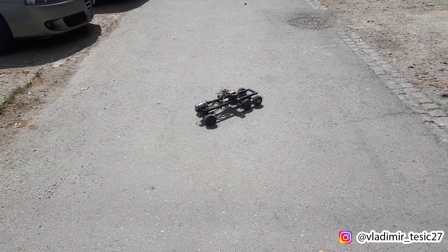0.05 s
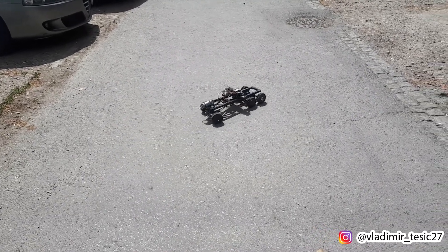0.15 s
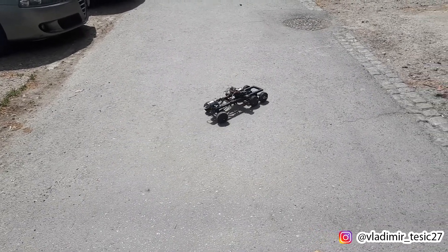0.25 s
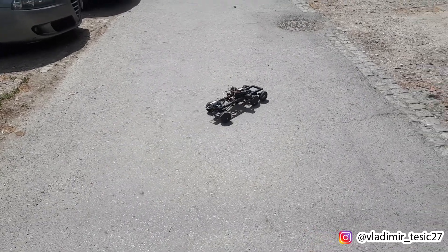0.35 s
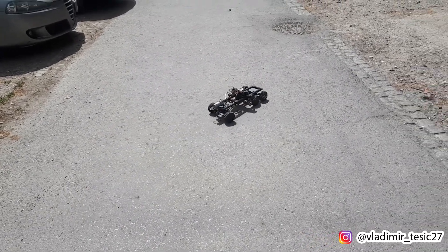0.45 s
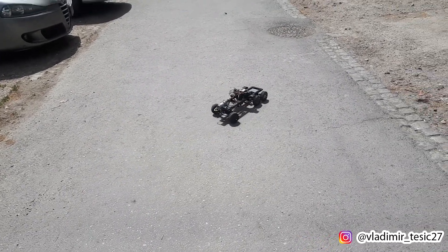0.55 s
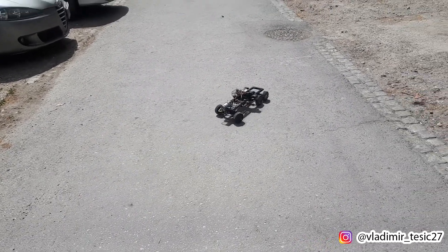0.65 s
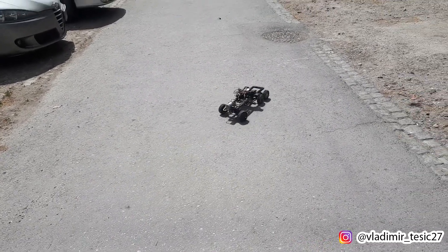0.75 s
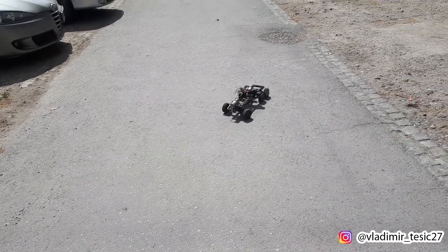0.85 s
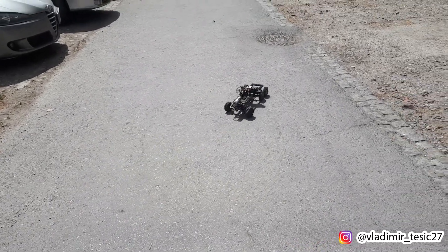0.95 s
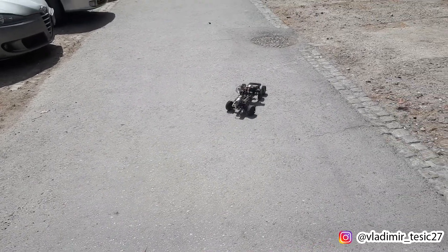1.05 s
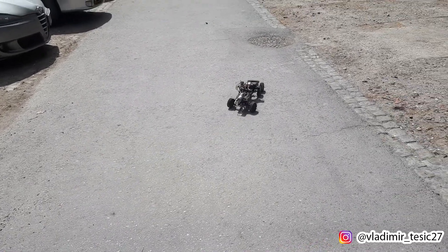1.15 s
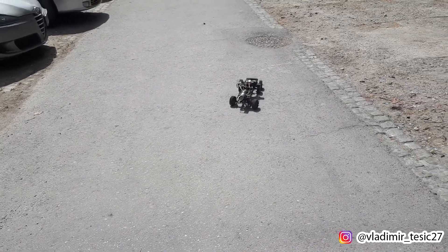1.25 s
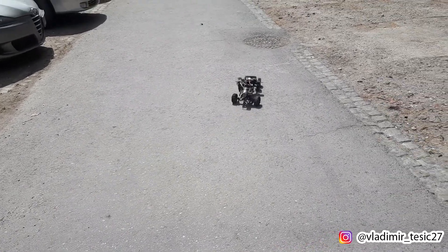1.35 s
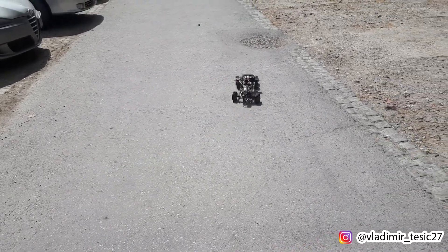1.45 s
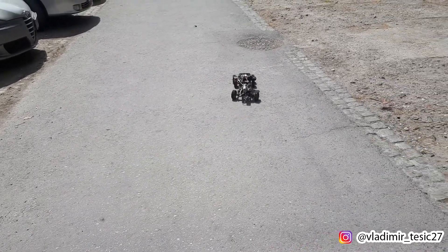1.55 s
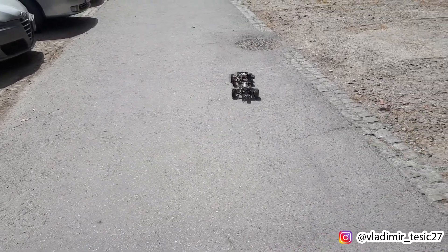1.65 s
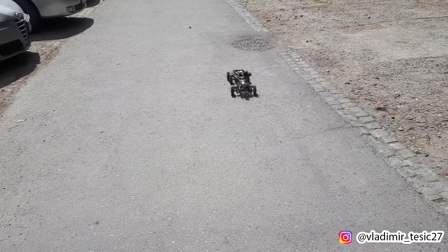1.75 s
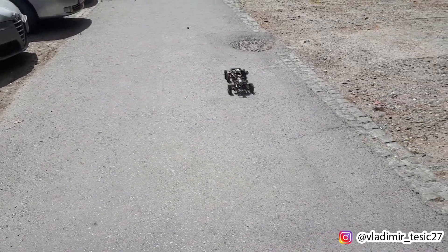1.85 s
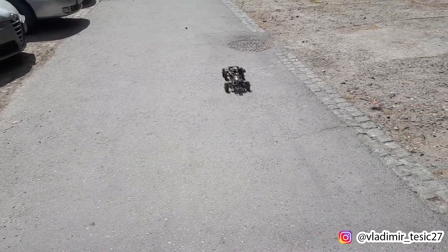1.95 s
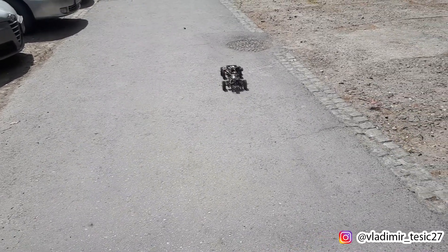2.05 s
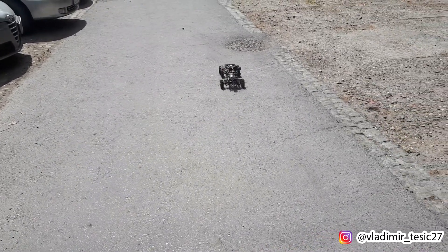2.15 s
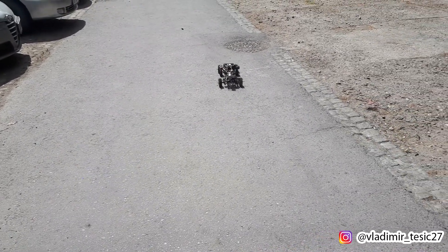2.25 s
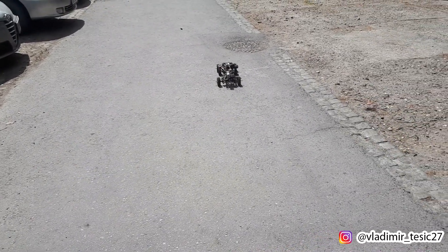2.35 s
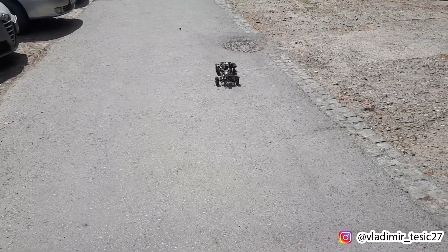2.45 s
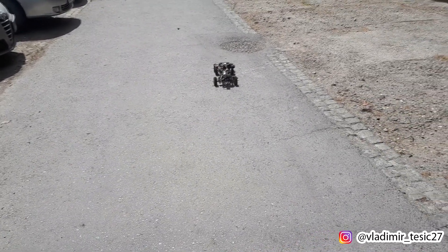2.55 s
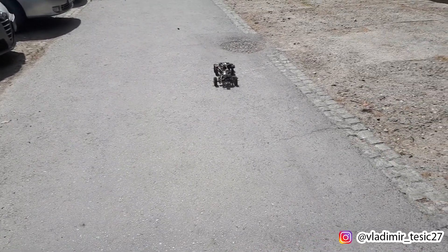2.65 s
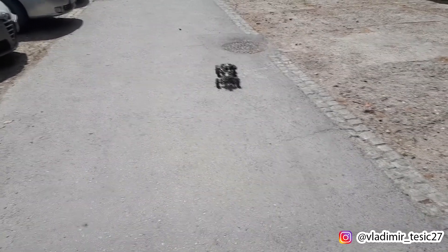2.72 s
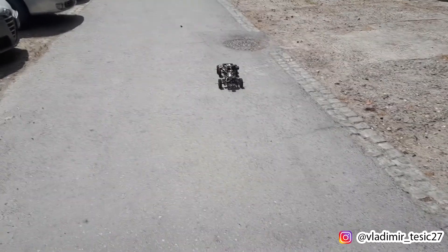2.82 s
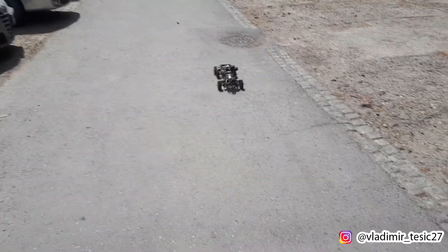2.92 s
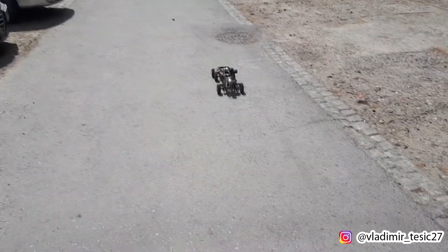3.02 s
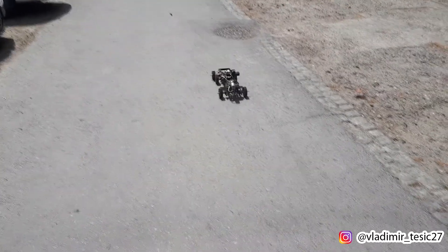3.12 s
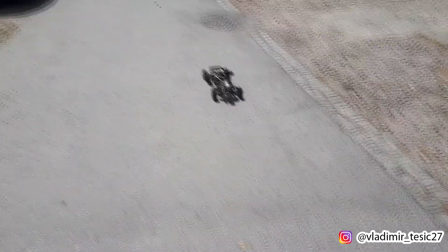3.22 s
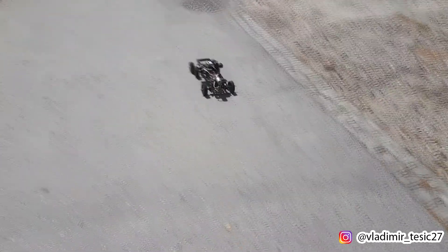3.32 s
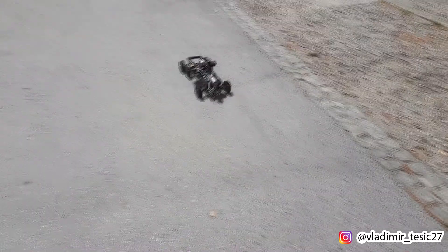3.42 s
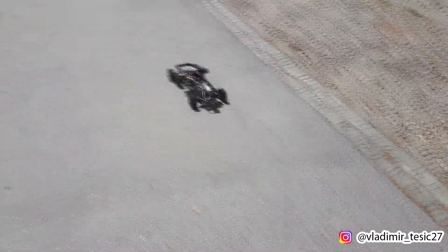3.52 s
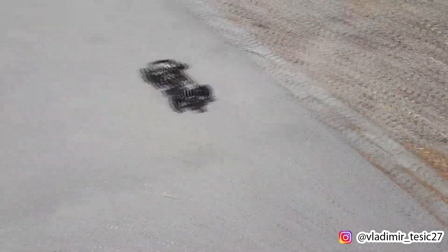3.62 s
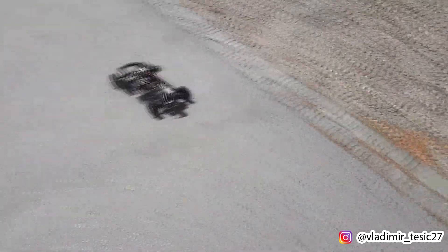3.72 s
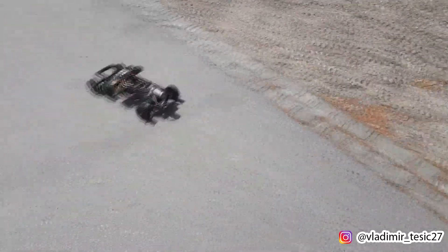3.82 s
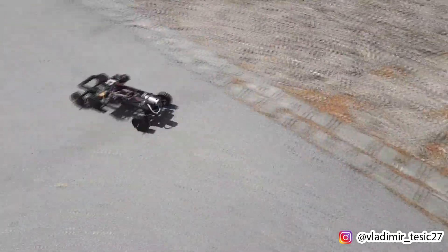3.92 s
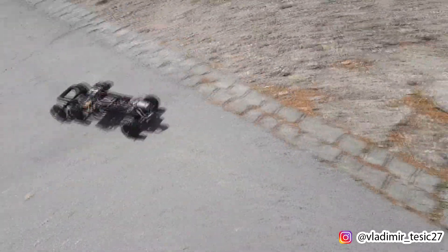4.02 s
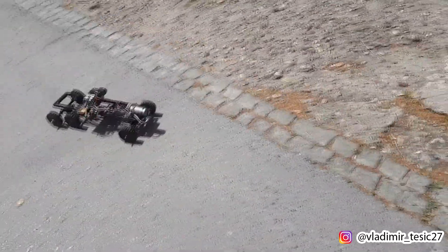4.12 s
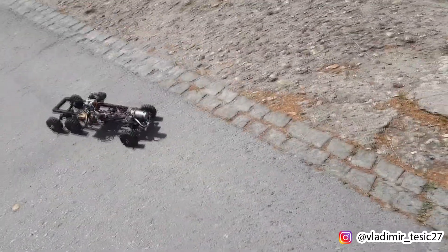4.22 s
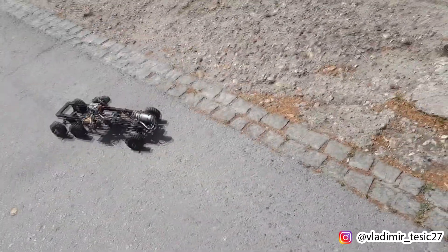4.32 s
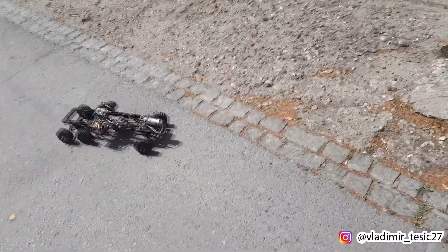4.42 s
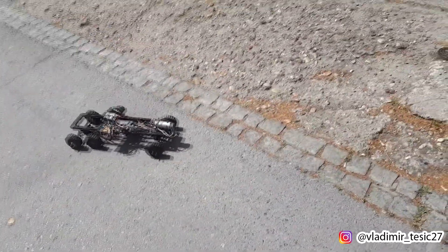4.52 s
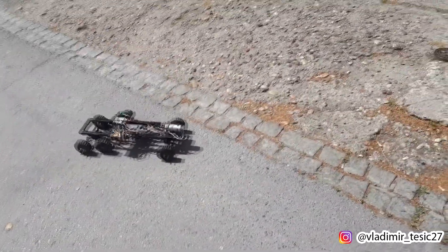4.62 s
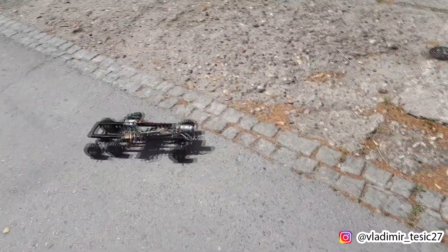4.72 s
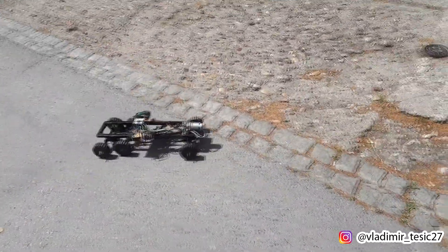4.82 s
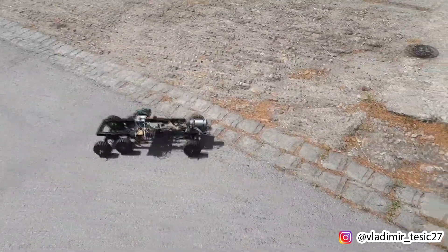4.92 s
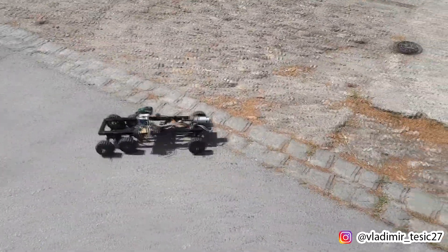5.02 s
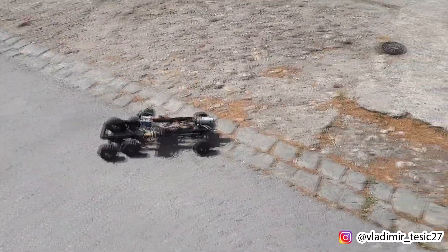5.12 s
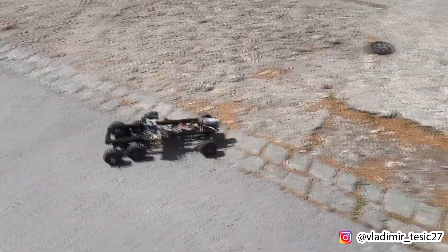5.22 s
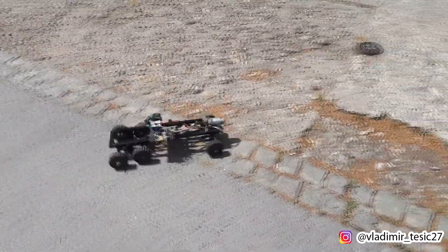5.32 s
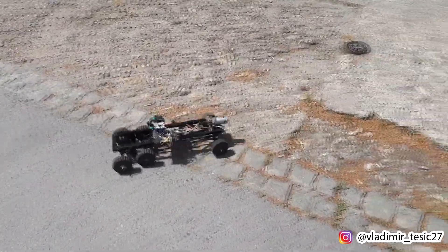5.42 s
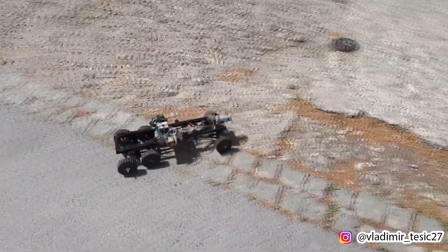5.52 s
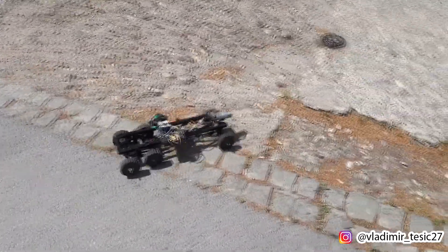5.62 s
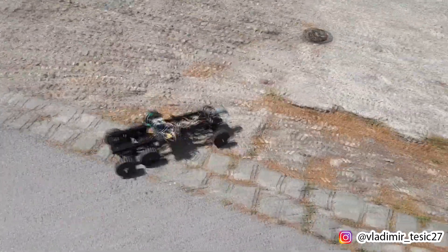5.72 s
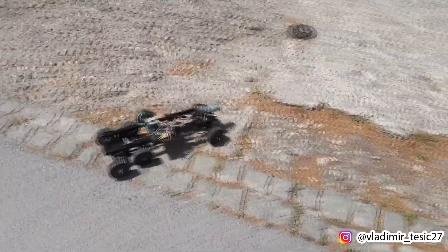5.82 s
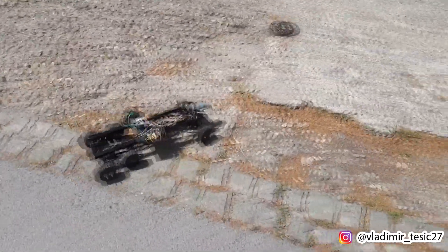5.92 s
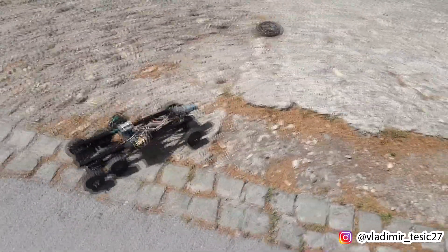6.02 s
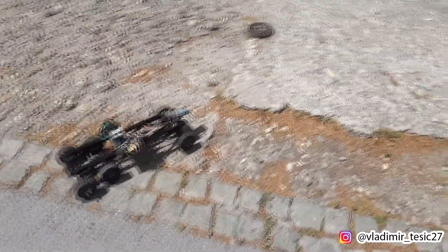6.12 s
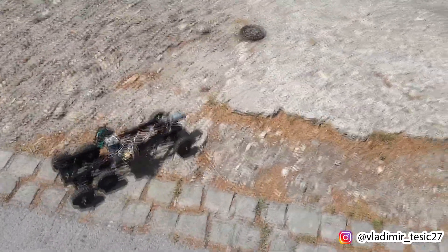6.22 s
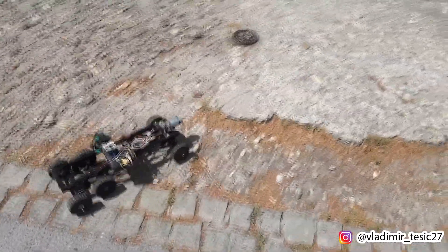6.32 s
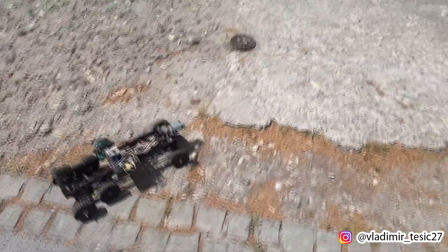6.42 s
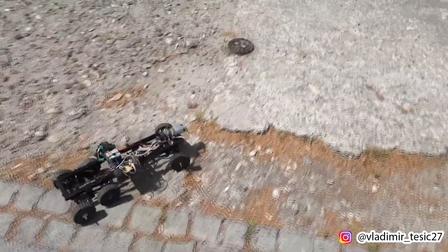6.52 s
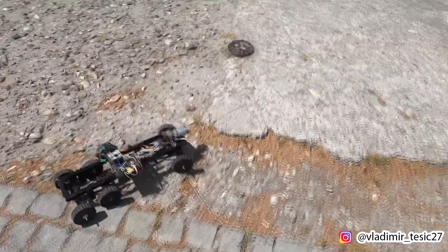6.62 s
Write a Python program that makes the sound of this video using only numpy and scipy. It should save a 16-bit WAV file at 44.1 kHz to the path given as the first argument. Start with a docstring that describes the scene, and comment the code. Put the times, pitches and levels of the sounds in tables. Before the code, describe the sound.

Outdoors, over a faint rumble of town, the buzzing gear whine and hissy rattle of a remote-controlled truck waver rhythmically, then wind down to clicks and a short gritty scrub. The motor starts again and approaches the phone microphone, speeding up and slowing several times. Near the end the gears clatter and clack at a crawl, with short rasping surges. A few soft puffs of air touch the microphone midway.

```python
"""A bare-chassis radio-controlled truck reverses on asphalt, stops with a scrub, then comes close and
crawls onto cobbles. Its spur gear binds once a turn, modulating the tooth force, so the mesh whine
comes in bursts and the drive train rattles in step with it. Tyres roll, two brief squeals rise, the
chassis knocks and the slowing gears clack. Light air puffs on a phone with two spaced ports, over a
low town rumble."""
import sys
import numpy as np
from scipy import signal
from scipy.fft import rfft, irfft
from scipy.io import wavfile
from scipy.ndimage import uniform_filter1d

SR = 44100
rng = np.random.default_rng(int(sys.argv[2]) if len(sys.argv) > 2 else 0)


def store_wav(level_fs):
    """Save 16-bit WAV to argv[1]."""
    pcm = np.round(np.clip(np.atleast_2d(level_fs), -1, 1) * 32767)
    wavfile.write(sys.argv[1], SR, pcm.T.astype(np.int16))


N = 293706
T = np.arange(N) / SR
HZ = np.maximum(np.arange(N // 2 + 1) * SR / N, 1)

TEETH, FULL_SPEED = 21, 80  # of the spur gear; speed in turns per second
# Throttle moves. Each row: start in seconds, target speed in turns per second, lag in seconds, base
# levels of rattle and whine in dB, looseness (joint chatter as a ratio to the once-a-turn tick).
THROTTLE = [(-1.0, 78.8, .2, -30.9, -36.3, 1.2), (1.72, 0, .54, -30.8, -42.5, 1.2),
            (2.02, 0, .11, -31, -37.5, 1.6), (2.69, 50, .18, -32, -45, 1.7),
            (2.89, 78.5, .13, -32.2, -39.7, 2.4), (3.86, 22, .16, -33.3, -41, 2.0),
            (3.97, 28, .05, -36.5, -40, 1.7), (4.055, 57.5, .06, -27, -37.2, 1.6),
            (4.46, 77.5, .42, -28.2, -37.6, 1.4), (5.39, 14, .48, -29.5, -31, .5),
            (5.73, 21.7, .09, -32.5, -36, .6), (5.985, 52, .115, -31.5, -29.7, .55),
            (6.135, 24, .16, -26.7, -28.8, 1.1), (6.46, 37.5, .11, -26, -30.3, 1.3)]


def truck():
    """Spherical spreading: whine, rattle and tyre roll grow with speed and fall as 1 / distance."""
    # Each row: time in seconds, distance in metres, whine lift in dB, whine left minus right in dB,
    # hiss lift in dB, second and third harmonic in dB, side shown (-1 left, 0 nose, 1 right).
    path = [(.04, 2.15, 4, .5, -1, -1, -3, -1), (.11, 2.18, -1, .5, -.8, 0, -3, -1),
            (.3, 2.3, -6, 0, -1, 0, -3, -1), (.55, 2.35, .6, -.5, -.8, 4, -1, -.95),
            (.9, 2.5, .5, -1, -.8, -2, 1, -.25), (1.5, 2.75, .8, -2.5, -2, -1, 4, 0),
            (1.78, 2.9, 1, -2.5, -1.2, -3, 4.5, 0), (2.2, 3.6, 0, -2, -1.5, -5, 0, 0),
            (3.2, 3.6, .4, -4.5, 0, -8, -6, 0), (3.6, 2.95, 0, -3, 1, -8, -7, .1),
            (3.7, 2.77, -4, -2.5, 1.4, -7, -7, .3), (3.81, 2.58, -6.5, -2.5, 1.3, -4, -7, .4),
            (3.86, 2.5, 0, -2.5, 1.2, -5, -7, .4), (4.3, 1.8, 1, -2, -.1, -4, -7, .7),
            (5.25, 1.4, -1, -1.8, -.9, -4, -7, .65), (5.8, 1.32, -.2, -1.3, -.4, -6, -7, .7),
            (6.15, 1.27, .3, -1, 1.5, -7, -7, 1)]
    # The truck moves aside. Each row: time in seconds, rattle's delay at the right port in samples.
    bearing = [(0, 9.5), (.9, 8), (1.6, 9), (2.2, 10), (3.7, 10), (4.2, 12), (4.7, 11.5), (5.3, 10),
               (5.8, 10), (6.2, 12)]
    kerb_s = 5.733  # the kerb checks the truck with the gear at its tight spot
    crawl_speed, sing_speed = 24, 38  # turns per second: teeth clatter at a crawl, then sing
    kept, strain_db, release_db = binding()
    speed = gear_speed() * kept
    rattle_db, whine_db, loose = gear_load()
    distance, aimed_db, pan_db, facing_db, second_db, third_db, side = curves(path)
    (lag,) = curves(bearing)
    rasp_db, shaken_db = rasps()
    decades = np.log10(speed / FULL_SPEED)
    turns = np.cumsum(speed) / SR
    turns = turns - np.interp(kerb_s, T, turns) + .03 * walk(26)  # early and late on uneven ground
    moving = np.clip((speed - 3) / 12, 0, 1)
    singing = np.clip((speed - crawl_speed) / (sing_speed - crawl_speed), .15, 1)
    swell_db = release_db + .9 * walk(20)  # the whine fades in and out as the mesh shifts
    gears = whine(turns, speed, loose, side) * undb(whine_db + aimed_db + swell_db) * pan(pan_db)
    hiss_db = .8 + facing_db + 6 * decades + strain_db
    links_db = -17 + 6 * np.clip(side, 0, 1) + shaken_db
    frame = rattle(turns, loose, hiss_db, second_db, third_db + release_db, links_db, side, lag)
    drive = (gears * singing + frame * undb(rattle_db + rasp_db)) * undb(22 * decades)
    return moving * (drive + tyres(decades)) / distance


def gear_speed():
    """Inertia: the motor eases toward each new target speed, in turns per second."""
    speed = np.zeros(N)
    for s, target, lag_s, *_ in THROTTLE:
        i = max(int(s * SR), 0)
        speed[i:] = speed[i] + (target - speed[i]) * np.tanh((T[i:] - s) / lag_s)
    return np.maximum(speed, 1)


def gear_load(take_up_s=.07):
    """Load take-up: rattle dB, whine dB and looseness shift after each throttle move, then hold."""
    moves = np.array(THROTTLE)
    held = moves[np.searchsorted(moves[:, 0], T - take_up_s / 2) - 1, 3:]
    return uniform_filter1d(held, int(take_up_s * SR), axis=0).T


def binding(strain_s=.036, release_s=.05):
    """Friction: in reverse each bind hisses going in, slows the gears and sings coming out."""
    # Hard and light binds alternate. Each row: centre in seconds, half length in seconds,
    # share of speed lost, hiss lift in dB, whine lift in dB.
    binds = [(.015, .058, .14, 0, 1), (.165, .022, .025, 4, 1.5), (.34, .06, .105, 5, 3),
             (.505, .022, .015, 2, 2), (.675, .045, .1, 3.5, 3.5), (.845, .022, .02, 1.5, 1.5),
             (1.005, .045, .105, 4.5, 3.5), (1.165, .022, .02, 2.5, .5), (1.32, .048, .085, 4, 3.5),
             (1.48, .022, .005, 2, 1), (1.645, .05, .07, 4.5, 1)]
    kept, strain_db, release_db = 1, 0, 0
    for s, half, sag, hiss_db, whine_db in binds:
        kept -= sag * np.exp(-np.abs((T - s) / half) ** 3)
        strain_db += hiss_db * np.exp(-((T - s + half) / strain_s) ** 2)
        release_db += whine_db * np.exp(-((T - s - half - release_s) / release_s) ** 2)
    return kept, strain_db, release_db


def tight_spot(turns, sharp, base, scatter_db):
    """Amplitude modulation: tooth force swells once a turn, by a random amount, over steady contact."""
    sizes = undb(scatter_db * rng.standard_normal(1000))
    swell = np.exp(sharp * (np.cos(2 * np.pi * turns) - 1))
    return unit(base + sizes[np.round(turns).astype(int) % 1000] * swell)


def whine(turns, speed, loose, side, forward_s=2.4):
    """Gear meshing: a tone at the tooth rate, dragged flat at the tight spot, roughened by play."""
    # Radiation from the gear case. Each row: frequency in Hz, gain in dB.
    case = [(400, -39.5), (750, -2.5), (980, 1.5), (1160, 0), (1380, 3.2), (1600, 3), (1800, -4),
            (3000, -16)]
    drag = np.where(T < forward_s, .3, 1.1) * (speed / FULL_SPEED) ** 2
    wobble = (.1 + .24 * loose) * walk(260) + .3 * walk(22)
    play = .02 * loose ** 2 * walk(90)
    mesh = 2 * np.pi * TEETH * turns - drag * np.sin(2 * np.pi * turns) + wobble
    force = tight_spot(turns + play, sharp=3.2, base=.14 * loose, scatter_db=1.8)
    force *= undb((.4 + .7 * loose) * walk(300))
    tone = unit(colour(force * np.sin(mesh), case))
    right_delay_s = np.interp(side, (0, 1), (6.5, 8.5)) / SR
    return np.array([tone, np.interp(T - right_delay_s, T, tone)])


def overtones(turns, second_db, third_db):
    """Harmonics: twice and three times the tooth rate, the third ringing in the gear cover."""
    # Response of the cover. Each row: frequency in Hz, gain in dB.
    cover = [(2500, -9), (4000, -5), (4380, 2.5), (4660, -3.5), (4950, 0), (5300, -1), (6500, -8)]
    mesh = 2 * np.pi * TEETH * turns
    second = undb(second_db + walk(12)) * np.sin(2 * mesh + .75 * walk(260))
    third = colour(undb(third_db + walk(12)) * np.sin(3 * mesh + .85 * walk(300)), cover)
    return tight_spot(turns, sharp=2.4, base=.25, scatter_db=1.8) * (second + third)


def rattle(turns, loose, hiss_db, second_db, third_db, links_db, side, lag):
    """Impact noise: teeth, joints and links clatter through the frame, most at the tight spot."""
    # The right port is shaded from the treble. Each row: frequency in Hz, left and right gain in dB.
    spectrum = [(60, -67, -36), (493, -22.5, -24), (760, -2.5, -4), (1200, -11, -6), (1780, -7, -1.5),
                (2080, -2.5, -1), (2760, -2, 0), (3150, -1.5, -2.5), (3950, -2.5, -4), (4900, -2, -20),
                (5830, -4, -9), (8900, -9, -28), (10600, -5.5, -17), (15500, -7, -24)]
    # Each row: frequency in Hz, share of the power common to both ports.
    coherence = [(700, .9), (2000, .78), (4000, .55), (8000, .38)]
    teeth = 1 + .16 * np.cos(2 * np.pi * TEETH * turns)
    force = tight_spot(turns + .02, sharp=2.6, base=loose, scatter_db=1.2) / (loose + .3)
    force *= undb(.7 * walk(40))
    shared = np.interp(HZ, *np.transpose(coherence))
    common, own = ports(grit(1.5), lag), np.array([grit(1.5), grit(1.5)])
    grains = irfft(np.sqrt(shared) * rfft(common) + np.sqrt(1 - shared) * rfft(own), N)
    harmonics = undb(-13.5) * ports(overtones(turns, second_db, third_db), lag)
    impacts = unit(force * teeth) * grains + harmonics
    at_ports = np.array([colour(ground_bounce(impacts[k]), spectrum, column=k) for k in range(2)])
    clatter = radiate(at_ports, side)
    hiss = irfft(rfft(clatter) / (1 + (6000 / HZ) ** 10), N)
    return clatter - hiss + undb(hiss_db) * hiss + undb(links_db) * jingle(force, lag)


def radiate(sound, side):
    """Directivity: the rattle has its own tone from each side, and these blend as the truck turns."""
    # Peaks and dips in the rattle's tone; the three highest lightly colour the hiss. Each row:
    # frequency and width in Hz, lift in dB from the left flank, the nose and the right flank.
    peaks = [(790, 260, 0, .5, -3), (1720, 200, 0, 0, -5), (1944, 150, 5.5, 5.5, 5.5),
             (2440, 180, 5, 5, -1), (2670, 170, -1.5, -2.5, 8), (3150, 200, 4, 1, 0),
             (3700, 160, -1.5, 1, 1), (4330, 240, 0, 6, -2), (4540, 180, 6, .5, 3), (4900, 200, 0, 5.5, -2),
             (5110, 200, -2, 2, 7), (5500, 220, 8.5, 3, 4.5), (6150, 500, -1.5, -4, -3),
             (6800, 400, 2, 2.5, -.5), (9900, 700, 1.5, 1.5, -1), (11800, 400, 1, 1, 2),
             (13200, 900, -1, 2, 0)]
    spectrum, out = rfft(sound), 0
    for k, view in enumerate((-1, 0, 1)):
        lift_db = sum(db[k] / (1 + (2 * (HZ - f) / width) ** 2) for f, width, *db in peaks)
        weight = np.maximum(1 - np.abs(side - view), 0)
        out += weight * irfft(spectrum * undb(lift_db), N)
    return unit(out)


def jingle(force, lag, blows_per_s=55):
    """Impulse response: loose links ring when struck at random, hardest at the tight spot."""
    # Links and drive shafts. Each row: frequency in Hz, level in dB, 60 dB decay time in seconds,
    # left minus right in dB.
    links = [(1960, -4, .016, 0), (2720, -4, .012, 0), (3600, -1, .012, 3), (4560, -1, .011, 8),
             (5080, 0, .013, 12), (5420, -2, .011, 8)]
    out = 0
    for hz, db, t60, pan_db in links:
        struck = rng.random(N) < blows_per_s / SR
        blows = struck * force * rng.choice([-1, 1], N) * undb(1.5 * rng.standard_normal(N))
        ring = signal.fftconvolve(blows, modes([(hz, db, t60)], T[:SR // 8]))[:N]
        out += ports(ring, lag) * pan(pan_db)
    return unit(out)


def rasps(edge_s=.03):
    """Transient loading: a jolt of torque makes the gears rasp and shakes the links."""
    # Each row: start and length in seconds, added rattle in dB, added link ringing in dB.
    jolts = [(.08, .12, 1.5, 0), (4.125, .11, 3, 2), (6.1, .1, 3.6, 6), (6.585, .06, 2, 3)]
    gates = [np.clip(np.minimum(T - s, s + length - T) / edge_s, 0, 1) for s, length, *_ in jolts]
    return np.array(jolts)[:, 2:].T @ np.array(gates)


def tyres(decades, cobbles_s=5.1):
    """Rolling noise: dense small impacts, 8 dB louder per decade of speed and louder on cobbles."""
    # Each row: frequency in Hz, gain in dB.
    spectrum = [(20, -36), (60, -9), (130, -3.5), (280, 3.5), (430, -6), (650, -4.5), (1200, -5.5),
                (4000, -45)]
    level_db = -51.8 + 8 * decades + 3.5 * (T > cobbles_s) + 2.5 * walk(25)
    roll = unit(colour(spread_noise(shared=.95, spread_db=2.15), spectrum))
    return roll * undb(level_db) * pan(-2.5)


def scrub(start_s=2.18, end_s=2.53, edge_s=.06, decay_s=.05, bite_db=-42.3, slide_db=-53):
    """Sliding friction: rubber bites into grit as the truck stops, then slides on more softly."""
    # Each row: frequency in Hz, gain in dB.
    spectrum = [(30, -28), (300, -15), (700, -5), (1100, -4.5), (1500, 3), (2400, -2), (3000, -12),
                (3800, -22), (5500, -27), (7000, -34), (15000, -30)]
    age = T - start_s
    gate = np.clip(np.minimum(age, end_s - T) / edge_s, 0, 1)
    bite = undb(bite_db) * np.exp(-np.maximum(age - edge_s, 0) / decay_s)
    friction = unit(colour(spread_noise(shared=.3, spread_db=.5), spectrum)) * undb(walk(110))
    return friction * gate * (bite + undb(slide_db)) * pan(-.5)


def knocks_and_clacks():
    """Impact excitation: short chassis knocks, and sharp gear clacks as the truck slows and crawls."""
    # Each row: start in seconds, relative level in dB, tilt in dB per octave, 60 dB decay time in
    # seconds, metal ring in dB, deck thud in dB, left minus right in dB.
    blows = [(1.7126, -23, 1.5, .018, -18, -25, 2), (1.7195, -22.5, -2.5, .045, -22, -6, 1),
             (1.7255, -25.5, -2, .03, -20, -7, 1), (1.731, -24.5, 2, .03, -15, -20, -1),
             (2.1345, -25, -2.8, .016, -8, -25, -8), (2.1622, -33, 0, .02, -25, -28, 7),
             (2.1667, -22.5, -2.6, .02, -7, -28, -3.5), (2.4997, -30.5, -3, .04, -35, -18, -14),
             (2.5277, -42, 4, .02, -30, -30, 8), (5.418, -29, -5, .02, -30, -1, 0),
             (5.5575, -29, 0, .015, -20, -10, 1), (5.6345, -31, 0, .025, -20, -12, 1),
             (5.6564, -28, 1, .02, -22, -3, 5), (5.6635, -22, 3, .016, -24, -5, 7),
             (5.6764, -29, 0, .015, -20, -14, 1), (5.7015, -27, 3, .012, -25, -20, 5),
             (5.7314, -33, 2.5, .025, -22, -14, 1), (5.789, -29, -4.5, .06, -30, -14, -2),
             (5.8005, -28, 5.5, .018, -28, -25, 16), (6.1184, -28, -2, .02, -25, -2, 3),
             (6.1444, -28, 2, .015, -16, -20, 4), (6.1714, -28, 0, .02, -14, -20, 2),
             (6.2174, -29, 0, .012, -12, -22, 3), (6.2545, -28, 3, .01, -21, -22, 5)]
    # Chassis resonances. Each row: frequency and width in Hz, gain in dB.
    chassis = [(890, 230, -9), (1500, 200, -7.5), (2260, 350, 10), (2750, 450, 1.5), (3750, 400, 1),
               (4850, 700, -7), (11600, 3700, -15)]
    # Modes of a small metal part and the deck. Each row: frequency in Hz, level in dB,
    # 60 dB decay time in seconds.
    metal = [(2630, -10, .016), (3780, -1, .016), (3990, -3, .022), (4560, -11, .014), (6600, -19, .012)]
    deck = [(810, -10.5, .04), (1000, -11, .03), (1530, -3.5, .04)]
    out, t = np.zeros((2, N)), T[:SR // 8]
    hz = np.arange(1, len(t) // 2 + 2) * SR / len(t)
    octaves = np.log2(np.maximum(hz, 500) / 3500)
    body = sum(undb(db) / (1 + 1j * (hz / f - f / hz) * f / width) for f, width, db in chassis)
    for s, db, tilt_db, t60, ring_db, thud_db, pan_db in blows:
        burst = rng.standard_normal(len(t)) * (undb(-60 * t / t60) + undb(-28 - 60 * t / .06))
        clack = irfft(rfft(burst) * body * undb(tilt_db * octaves), len(t))
        ring = undb(ring_db) * modes(metal, t) + undb(thud_db) * modes(deck, t)
        impact = ports(clack / np.abs(clack).max() + ring) * undb(db + 1) * pan(pan_db)
        i = int(s * SR)
        out[:, i:i + len(t)] += impact[:, :N - i]
    return out


def squeals():
    """Phase modulation: short rising tones, probably the steering servo, are roughened by jitter."""
    # Each row: start and length in seconds, first and last frequency in Hz, peak level in dB.
    glides = [(2.95, .09, 1700, 2200, -47), (3.83, .075, 3200, 3720, -45)]
    out, jitter = 0, 1.1 * walk(400)
    for s, length, start_hz, end_hz, db in glides:
        along = np.clip((T - s) / length, 0, 1)
        phase = 2 * np.pi * np.cumsum(start_hz + (end_hz - start_hz) * along) / SR
        out += undb(db) * np.sin(np.pi * along) * np.sin(phase + jitter)
    return ports(out)


def ground_bounce(x, lag_s=.000618, drift=.22, share=.28):
    """Comb filtering: a dull reflection off rough pavement wanders in delay as truck and phone move."""
    lag = lag_s * SR * np.exp(drift * walk(2.76))
    dull = signal.sosfilt(signal.butter(4, 4000, fs=SR, output="sos"), x)
    return x + share * np.interp(np.arange(N) - lag, np.arange(N), dull)


def street(x, t60=.32, wet_db=-15.5):
    """Scattering: parked cars and walls return a faint tail of echoes."""
    t = T[:SR // 2]
    tail = rng.standard_normal((2, len(t))) * undb(-60 * t / t60) * (t > .006)
    tail = signal.sosfilt(signal.butter(1, 4000, fs=SR, output="sos"), tail)
    tail /= np.sqrt(np.sum(tail ** 2, axis=1, keepdims=True))
    return x + undb(wet_db) * signal.fftconvolve(x, tail, axes=1)[:, :N]


def puffs():
    """Turbulent pressure: small eddies of air thump on the ports."""
    # Each row: centre in seconds, relative level in dB, half length in seconds.
    gusts = [(1.561, -33, 0.014), (2.119, -40.5, .012), (2.163, -33, 0.013), (2.194, -33.5, 0.0081),
             (2.928, -33, 0.01), (2.966, -40.5, .025)]
    swell = sum(undb(db) * np.exp(-((T - s) / half) ** 2) for s, db, half in gusts)
    air = rng.standard_normal(N) + 1.5 * rng.standard_normal((2, N))
    eddies = colour(air, [(20, -35), (70, -3.5), (140, -3.5), (220, -13), (400, -37), (1500, -58)])
    return unit(eddies) * swell * undb(-6) * pan(5.9)


def town(hum_hz=60.8):
    """Ambient noise: a distant rumble swells slowly beside a wavering low hum."""
    # The rumble's spectrum. Each row: frequency in Hz, gain in dB.
    spectrum = [(15, -42), (30, -16), (60, 0.5), (130, 0.5), (200, -6), (400, -12), (700, -6), (1900, -11),
                (2700, -13.5), (3400, -31), (6000, -38.5), (15500, -42)]
    # Swells of rumble and hum. Each row: time in seconds, relative level in dB.
    rumble_levels = [(0, -51), (1.4, -50), (2.1, -50.5), (2.6, -56.5), (3.3, -53.5), (4.1, -54), (4.6, -45),
                     (6.66, -52.5)]
    hum_levels = [(0, -88), (3, -70), (5, -75), (6.66, -57)]
    (rumble_db,), (hum_db,) = curves(rumble_levels), curves(hum_levels)
    noise = rng.standard_normal(N) + .68 * rng.standard_normal((2, N))
    rumble = unit(colour(noise, spectrum)) * pan(.5)
    phase = 2 * np.pi * hum_hz * T + walk(3.5)
    hum = (np.sin(phase) + .8 * np.sin(2 * phase)) * undb(hum_db + 3 * walk(5))
    return rumble * undb(rumble_db - 2.5 + walk(7.6)) + hum


def modes(table, t):
    """Free vibration: a struck part rings as a sum of damped sines."""
    return sum(undb(db - 60 * t / t60) * np.sin(2 * np.pi * hz * t) for hz, db, t60 in table)


def grit(spread_db):
    """Granular noise: dense small impacts of unequal size."""
    sizes = undb(spread_db * rng.exponential(size=N // 16 + 1))
    return unit(rng.standard_normal(N) * np.repeat(sizes, 16)[:N])


def spread_noise(shared, spread_db):
    """Partial coherence: grit from an extended source is only partly alike at the two ports."""
    common, own = ports(grit(spread_db)), np.array([grit(spread_db), grit(spread_db)])
    return np.sqrt(shared) * common + np.sqrt(1 - shared) * own


def ports(x, lag=10):
    """Path difference: sound reaches the right port lag samples after the left."""
    n = np.arange(len(x))
    return np.array([x, np.interp(n - np.round(lag), n, x, left=0)])


def pan(db):
    """Level difference: two gains, the left db above the right."""
    return undb(np.array([db, -db]).reshape(2, -1) / 2)


def walk(rate):
    """Low-passed noise: about rate new values a second, at rms 1."""
    return unit(irfft(rfft(rng.standard_normal(N)) / (1 + (HZ / (rate / 2)) ** 4), N))


def colour(x, points, column=0):
    """Spectral shaping by one dB column of a table that starts with frequency in Hz."""
    hz, *db = np.transpose(points)
    return irfft(rfft(x) * undb(np.interp(np.log(HZ), np.log(hz), db[column])), N)


def curves(rows):
    """Linear interpolation of a time table's columns, one value a sample."""
    s, *columns = np.transpose(rows)
    return [np.interp(T, s, c) for c in columns]


def unit(x):
    """Normalisation to rms 1."""
    return x / np.sqrt(np.mean(x ** 2))


def undb(db):
    """Decibels to amplitude ratio."""
    return 10 ** (np.asarray(db) / 20)


def scene():
    """Superposition: the truck and its echoes, the air on the phone and the town."""
    return street(truck() + squeals() + scrub() + knocks_and_clacks()) + puffs() + town()


def record(dry):
    """Band limiting: the phone cuts steeply above 15850 Hz."""
    return signal.sosfilt(signal.ellip(12, .1, 80, 15850, fs=SR, output="sos"), dry)


dry = scene()
out = record(dry)
store_wav(out)
```